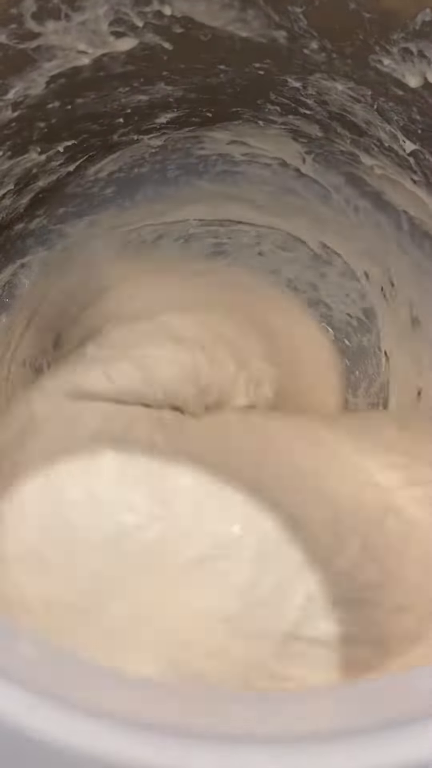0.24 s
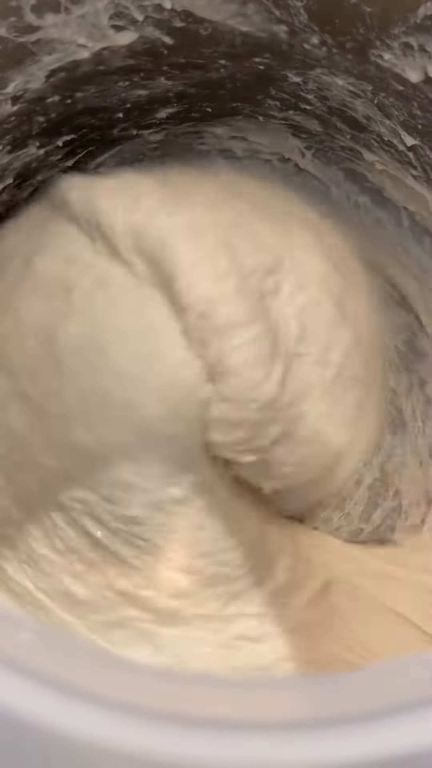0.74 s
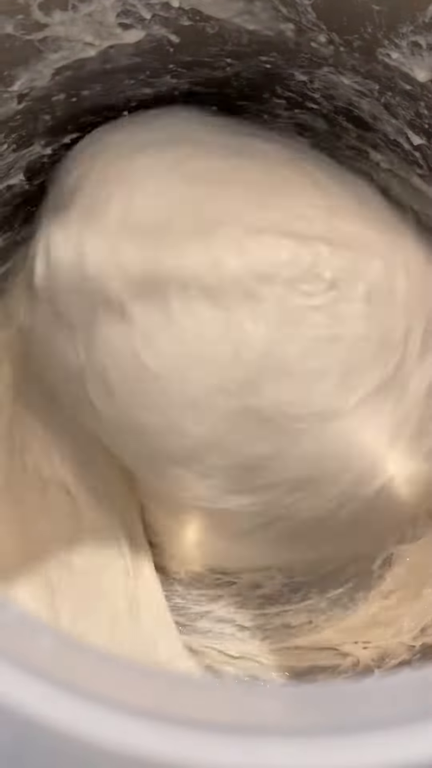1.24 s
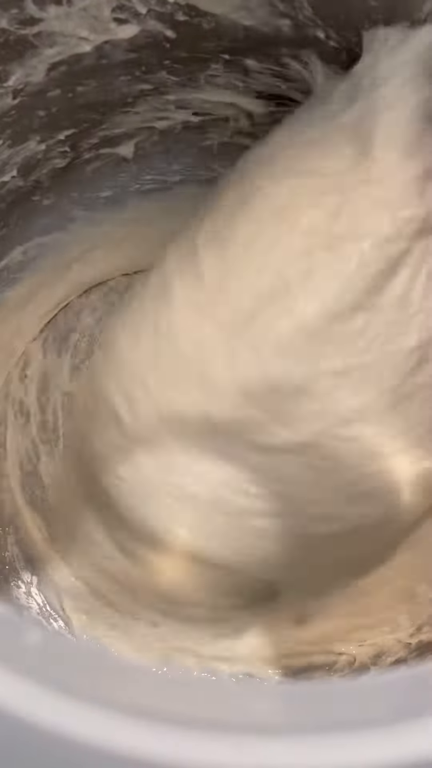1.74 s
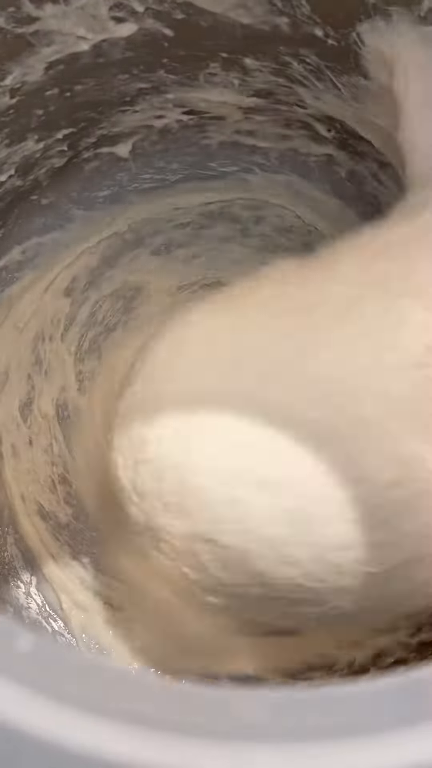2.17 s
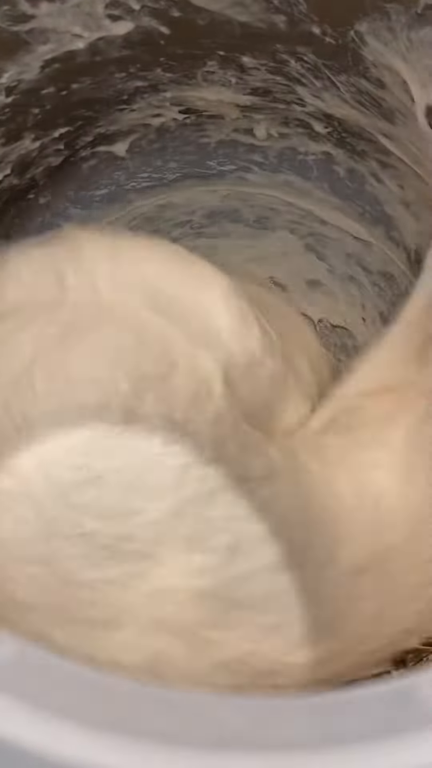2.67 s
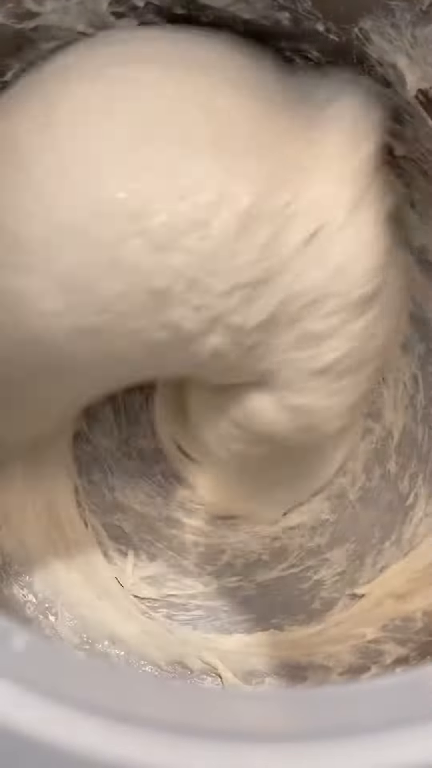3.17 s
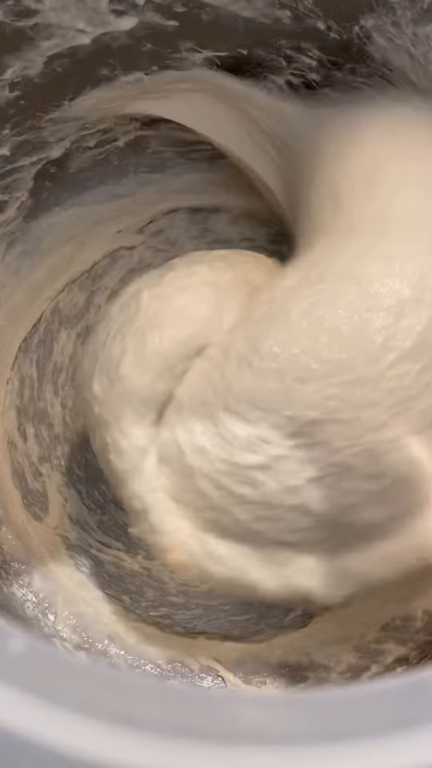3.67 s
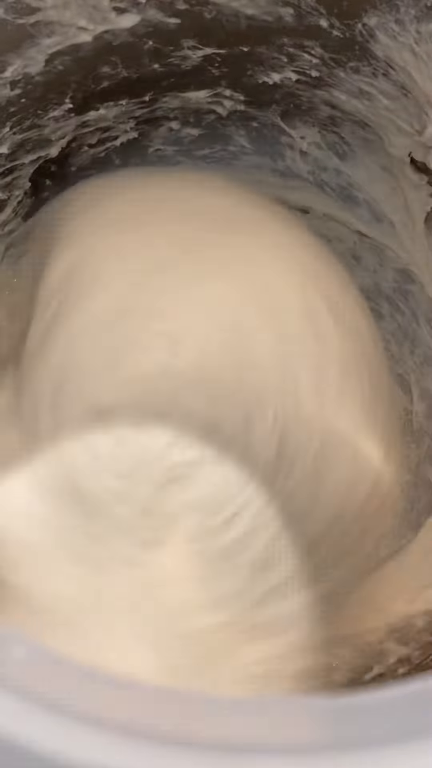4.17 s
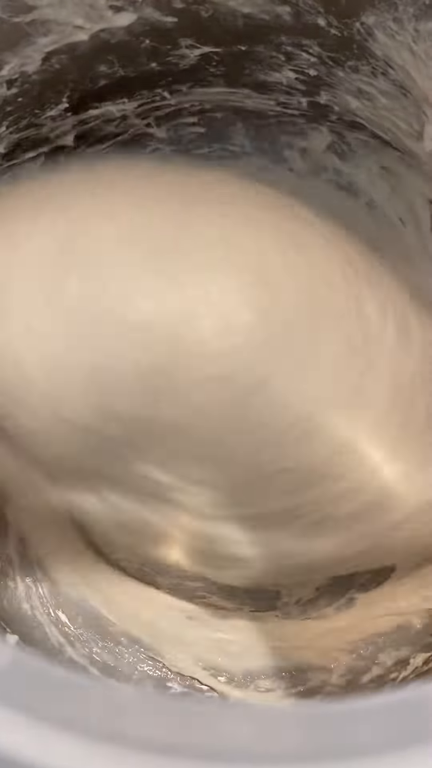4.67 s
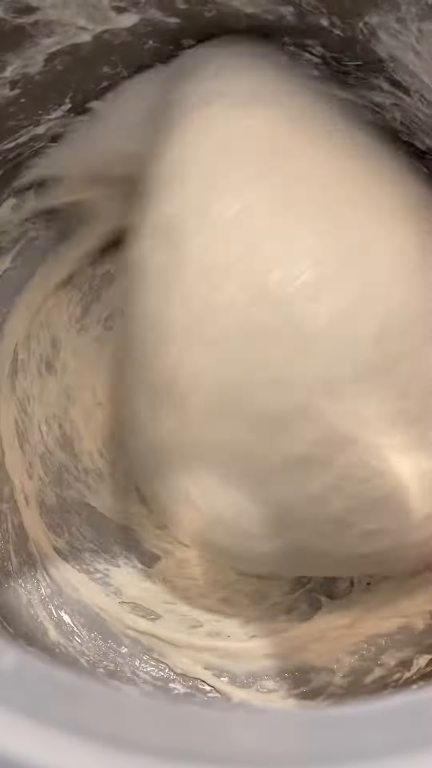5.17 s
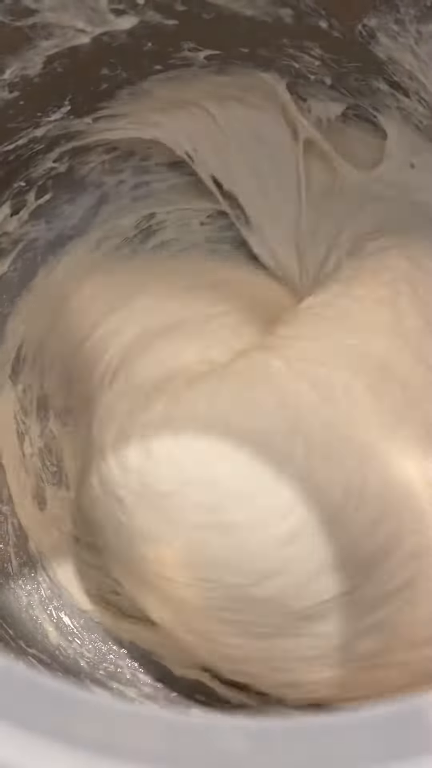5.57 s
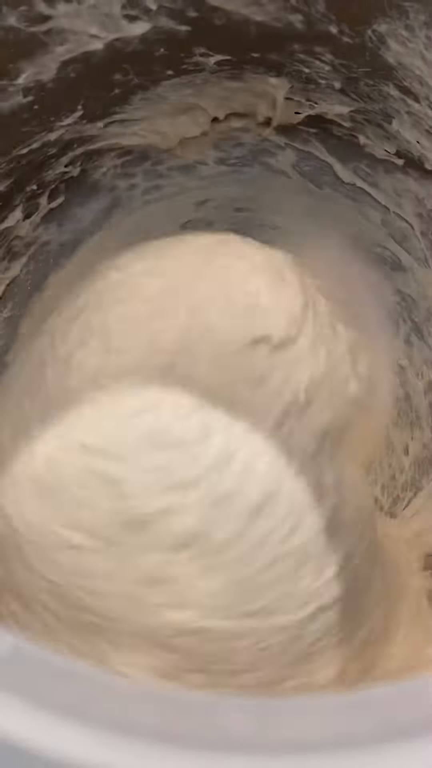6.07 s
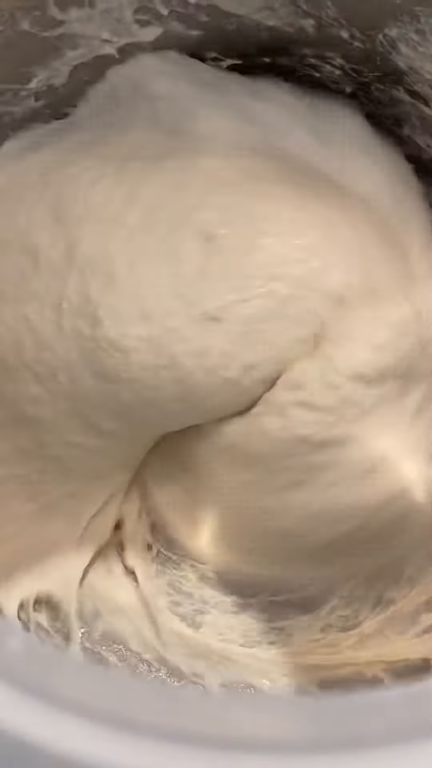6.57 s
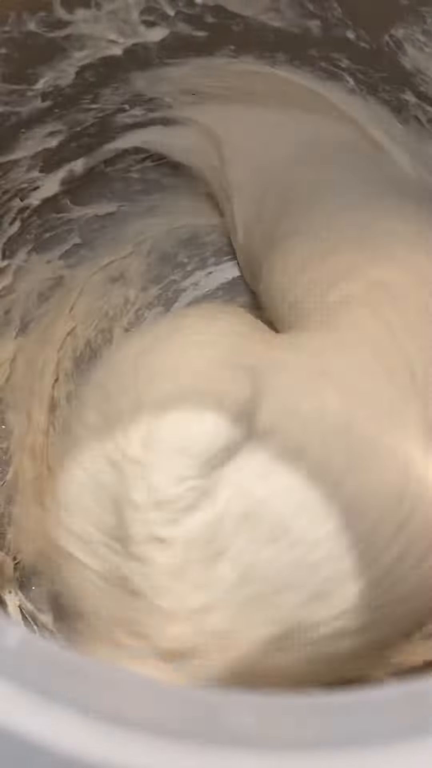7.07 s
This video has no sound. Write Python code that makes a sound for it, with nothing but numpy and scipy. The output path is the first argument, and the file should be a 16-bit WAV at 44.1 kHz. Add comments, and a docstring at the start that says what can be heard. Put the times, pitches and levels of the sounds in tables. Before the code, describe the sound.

Heard from the rim of a metal mixing bowl, heavy wet dough keeps turning. It peels with fine crackle and squelches, lands with short deep thumps and tears away with crisp smacks and rasping pops. Underneath are low drumming, mains-like hum, gear noise and a rumbling housing, pulsing about four times a second. The kneading never stops and cuts off still running, with no voice or music.

```python
"""Sticky crackle and low drumming open the scene, over the motor of an electric mixer kneading soft dough.
Close perspective: a two-port microphone at the rim of the steel bowl. About four times a second the hook
squeezes the dough and the motor whine, a swept sine, sags into a housing resonance. The lump thuds on the bowl
(short sinking tones), smacks off the wall (bursts of tiny snaps) and pops (rasping tones). Shaped noise makes
the crackle, the gears and the rumble that reaches the ports through the frame."""
import sys
import numpy as np
from scipy import signal
from scipy.fft import rfft, irfft, next_fast_len
from scipy.io import wavfile
from scipy.ndimage import uniform_filter1d, map_coordinates

SR = 44100
rng = np.random.default_rng(int(sys.argv[2]) if len(sys.argv) > 2 else 0)


def materialize(psi):
    """Save the field psi as 16-bit PCM at rate SR to the path in sys.argv[1].

    A 1-D psi becomes a single channel; in a 2-D psi each row is a channel.
    """
    bounded = np.clip(np.atleast_2d(psi).T, -1, 1)
    quanta = np.round(bounded * 32767).astype(np.int16)
    wavfile.write(sys.argv[1], SR, quanta)


N = 322371
TOP_HZ = 15900  # upper band limit of the microphone
# swing each way of the drumming and of the peeling over a turn; peeling peaks this long before the squeeze
DRUM_SWING_DB, PEEL_SWING_DB, PEEL_LEAD_S = 2.3, 2.45, 0.051

# All levels in the tables are relative; each source sets its own trim.
# The hook squeezes the dough: centre_s, whine_drop_hz, half_length_s, whine_level_db
SQUEEZES = [(.14, 85, .08, -39), (.4, 90, .085, -33), (.64, 88, .07, -34), (.885, 85, .075, -31),
            (1.135, 85, .08, -34), (1.4, 75, .07, -35), (1.65, 80, .07, -33), (1.87, 78, .06, -37),
            (2.1, 78, .06, -40), (2.37, 95, .07, -33), (2.62, 108, .09, -29), (2.89, 92, .07, -33),
            (3.16, 95, .08, -33), (3.4, 85, .07, -42), (3.64, 90, .07, -37), (3.92, 80, .07, -33),
            (4.21, 75, .07, -36), (4.48, 35, .09, -35), (4.71, 75, .1, -30), (4.97, 40, .06, -40),
            (5.2, 85, .07, -36), (5.45, 110, .07, -37), (5.7, 100, .08, -34), (5.96, 75, .06, -32),
            (6.19, 75, .06, -37), (6.46, 98, .08, -34), (6.71, 100, .08, -35), (7, 118, .09, -36),
            (7.28, 85, .06, -38)]
# The lump lands on the bowl: start_s, level_db, pitch_hz,
# rise_s (half the time to the peak; short = hard blow, long = soft lean), dead_weight_db
THUDS = [(.318, -20, 149, 0.0073, -24), (0.344, -23, 183, 0.0043, -20), (0.422, -16.5, 170, 0.0042, -0.5),
         (0.463, -20.5, 198, 0.0027, -23), (0.508, -21, 174, 0.003, -12), (.567, -21, 157, 0.0043, -14),
         (0.6704, -9, 170, 0.0046, -15), (0.905, -16, 139, 0.0035, -3), (.926, -19, 214, 0.0025, -8),
         (1.157, -16.5, 183, 0.0032, -8), (1.332, -16, 257, 0.0028, -11),
         (1.366, -19.5, 195.5, 0.0066, -20), (1.452, -18, 170, 0.003, -22), (1.582, -20, 167, 0.0047, -18),
         (1.693, -13, 192, 0.0035, -22), (2.272, -17.5, 159.4, 0.0053, -26), (2.4, -7.5, 198, 0.0032, -17),
         (2.463, -22.5, 202, 0.004, -20), (2.631, -13.5, 183, 0.0036, -10), (2.825, -16, 219, 0.0034, -22),
         (2.922, -13, 173, 0.0026, -1.5), (3.084, -19, 220, 0.0031, -5), (3.273, -18, 199, 0.0035, -22),
         (3.38, -21, 200, 0.0045, -18), (3.445, -18, 156, 0.0024, -18), (3.504, -20, 213, 0.0037, -24),
         (3.689, -21, 214, 0.0036, -11), (3.95, -18, 217, 0.0024, -3.5), (4.262, -17, 173, 0.003, -4),
         (4.754, -16.5, 197, 0.0034, -15), (5.004, -19, 179, 0.0047, -11), (5.15, -18.5, 200, 0.0024, -12),
         (5.251, -20, 200, 0.004, -20), (5.495, -8, 192, 0.0027, -11), (5.723, -12.5, 200, 0.0041, -4),
         (5.957, -21.5, 198, 0.0048, -20), (6.252, -18.5, 198, 0.0028, -22),
         (6.317, -16.5, 174, 0.0023, -15), (6.354, -19.5, 159, 0.0081, -20),
         (6.878, -24.5, 210, 0.0047, -15), (7.013, -12, 149, 0.003, -7), (7.049, -19.5, 200, 0.0031, -7)]
# Dough slaps or tears off the wall: start_s, level_db, body_db, tear_fineness_db, rise_s
SLAPS = [(0.053, -43.5, -6, -3, 0.0071), (0.422, -32.5, -5.5, 1, 0.0048), (0.51, -51, 7, -3, 0.0092),
         (.663, -32, 0, -3.5, .0026), (0.747, -53.5, 9, -4, .002), (0.895, -42, -5, -4, 0.0028),
         (1.108, -49, -2, -2, 0.0083), (1.154, -39.5, -18, 4.5, 0.0033), (1.251, -45, 0.5, -3.5, 0.0029),
         (1.307, -45.5, 1, -6.5, 0.0038), (1.333, -23, -4, -5, 0.0018), (1.433, -40.5, -27, -1, 0.00086),
         (1.583, -50, -5, 5.5, .003), (1.634, -35.5, -20, 2.5, 0.0021), (1.69, -32.5, -11, -4, 0.0015),
         (1.83, -43, -15, -1, 0.0064), (2.035, -33.5, -19, -5, 0.0042), (2.395, -34, -8, 0.5, .0026),
         (2.504, -32, -5, 2, 0.0019), (2.564, -50.5, 4, 7, 0.006), (2.672, -52.5, -22, 12, .002),
         (2.79, -41, 5, -5, 0.0025), (2.811, -38, 2, -1, 0.003), (2.907, -50, 10.5, 3, 0.013),
         (2.984, -44.5, -8, -1, .003), (3.178, -41, -8, 3.5, .0026), (3.242, -49.5, -2.5, 3, .002),
         (3.441, -43, 3, -3, .0015), (3.632, -49, 5.5, 8, 0.0093), (3.704, -44.5, -16, 0, .002),
         (3.861, -42, 1.5, -3.5, 0.0016), (4.082, -46.5, -3.5, -2.5, .003), (4.118, -42, -5, 1, 0.0032),
         (4.531, -47, 2, -2, 0.0046), (4.677, -45, -21, -2, 0.0046), (4.835, -59, 15, -4, .0026),
         (4.964, -44.5, -20, 1.5, .0026), (5.03, -44.5, -30, 4, .001), (5.117, -56, 0, -4, .003),
         (5.354, -51, 2.5, 8, 0.0018), (5.375, -50, 6, 2, 0.0075), (5.401, -45, -3, -3, .005),
         (5.488, -30.5, -13, -5, 0.00077), (5.612, -42, -2, -2.5, 0.00093),
         (5.72, -30.5, -19, -7.5, 0.0019), (5.8, -52, -5, -2.5, 0.0037), (5.879, -38.5, -7.5, -2.5, 0.0034),
         (5.986, -51.5, -15, 11, 0.0017), (6.083, -45.5, -7, -3, 0.006), (6.25, -31.5, -25, 4.5, 0.0017),
         (6.42, -44, -5, -0.5, 0.011), (6.486, -49, -3, -3, 0.0031), (6.63, -42, -16, 9, 0.0016),
         (7.007, -41, -18, 3, .002), (7.209, -36.5, -1, 3.5, 0.0046), (7.221, -37.5, -8, 0, 0.0014)]
# Air pockets pop out of the dough: start_s, level_db, pitch_hz
POPS = [(.152, -44, 1440), (.276, -45, 1490), (.333, -39.5, 677), (.413, -30.5, 1636), (.424, -38, 1444),
        (.449, -35.5, 732), (.619, -40, 507), (.663, -29, 2243), (.68, -34, 724), (.748, -40, 985),
        (.862, -43, 1386), (.9, -38, 500), (1.014, -42, 958), (1.064, -38.5, 802), (1.135, -43.5, 1430),
        (1.157, -43, 885), (1.249, -39, 1410), (1.334, -27, 946), (1.335, -29, 1770), (1.706, -45, 1370),
        (2.496, -38, 1455), (2.505, -30, 2070), (2.516, -35, 1910), (2.507, -35.5, 662),
        (2.602, -35.5, 1224), (2.628, -38.5, 1518), (2.79, -36, 1864), (2.904, -40, 1470),
        (2.912, -41, 1047), (3.167, -41, 940), (3.35, -40, 1000), (3.443, -30, 941), (3.632, -37.5, 1028),
        (3.865, -50, 1160), (3.905, -45.5, 1360), (4.044, -45, 931), (4.117, -45, 970), (4.534, -42, 1416),
        (5.184, -36.5, 1490), (5.37, -43, 462), (5.382, -47, 850), (5.412, -34, 650), (5.49, -40, 927),
        (5.724, -35, 2570), (6.098, -47, 2140), (6.143, -43.5, 1134), (6.335, -32.5, 1220),
        (6.435, -43.5, 1120), (6.657, -42.5, 1380), (6.685, -46, 2040), (6.728, -49, 1323),
        (6.874, -43, 900), (6.918, -44, 952), (7.042, -42, 740), (7.218, -42, 1520), (7.224, -30, 544)]
# Sticky peeling of the dough: time_s, level_db
PEELING = [(0, -41.5), (.35, -44.5), (.6, -43.5), (.85, -40.5), (.98, -44.5), (1.15, -40.5), (1.52, -49),
           (1.65, -40), (1.92, -46), (2.2, -40), (2.33, -42.5), (2.6, -39.5), (2.75, -43.5), (2.86, -40),
           (3.4, -42), (3.6, -40), (3.78, -42.5), (3.9, -42.5), (4.35, -49.5), (4.8, -46), (5.08, -46.5),
           (5.38, -39), (5.53, -42), (5.63, -40.5), (5.8, -43.5), (5.92, -43), (6.65, -41), (6.78, -44),
           (6.88, -40), (7.1, -46), (7.3, -46)]
# Dough pressing and tumbling in the bowl: time_s, level_db
TUMBLE = [(0, -29.5), (.6, -24), (1, -27.5), (2, -26), (2.6, -26.5), (3.4, -25.5), (4, -28), (4.09, -29),
          (4.18, -27.5), (5.3, -27.5), (5.45, -28.5), (5.68, -28.5), (5.8, -24), (5.97, -29.5), (6.02, -32),
          (6.09, -37), (6.13, -24), (6.175, -29), (6.2, -44), (6.235, -35), (6.27, -27.5), (6.7, -28),
          (7.3, -25.5)]
# Deep sway of the machine, swelling each time the lump comes round: time_s, level_db
SWAYING = [(0, -48), (.25, -55), (.65, -53), (1.35, -38.5), (1.95, -50), (2.7, -40.5), (3.65, -46.5),
           (4.15, -36), (4.75, -52), (5, -46), (5.35, -57), (5.7, -42), (6.45, -53), (6.75, -43.5),
           (7.3, -43.5)]
# Housing shake: time_s, level_db
SHAKING = [(0, -36), (.55, -30.5), (2, -34.5), (3.3, -31), (5.1, -35), (5.5, -23.5), (5.9, -30), (7, -29.5),
           (7.3, -30)]
# Frame vibration that moves both ports together: time_s, amplitude_share (0-1)
FRAME_TOGETHER = [(0, 0.25), (4.9, 0.03), (5.3, 0.33), (6.3, 0.07), (6.7, 0.69), (7.3, 1)]
# Part of the whine that reaches both ports alike: time_s, level_db
WHINE_SHARED = [(0, -15), (3.4, -15), (3.9, -12), (4.7, -9), (6, -9), (6.6, -13), (7.3, -8)]

# Modes of the loaded bowl: centre_hz, width_hz, level_db
BOWL_MODES = [(113.6, 34, -8), (139.6, 21.3, 0.5), (224.3, 51, 1.5), (243.5, 31.7, -3.5)]
# Modes of the air hollow in the bowl: centre_hz, width_hz, level_db
HOLLOW_MODES = [(937, 68, 3.5), (1117, 110, -2.5), (1371, 48, 1.5), (1620, 8, -24), (1783, 5, -12),
                (1955, 26, 3), (2024, 36, 8), (2300, 55, 1.5), (2550, 14, 6.5), (2706, 52, 0.5),
                (2820, 41, 8.5), (3260, 23, 2.5), (3550, 26, 8.5), (3900, 25, 5), (3970, 15, -15),
                (4260, 38, 12.5)]
# Motor hum lines, mains multiples 2 to 4: level_db
MAINS_LINES_DB = [-15, -3, 0]

# Colours of the noises, all: frequency_hz, density_db (per Hz)
# dull knock of a landing
KNOCK_COLOUR = [(150, -12), (300, 1), (450, -4), (700, -18), (1500, -20)]
# a slap: its body, its smack and its fine spray
BODY_COLOUR = [(200, -4), (350, 10.5), (560, -9), (800, 7.5), (1000, -0.5), (1500, 1.5), (3000, -16)]
SMACK_COLOUR = [(1200, -8.5), (2600, 5.5), (4000, 10.5), (6000, 1.5), (9000, -32)]
SPRAY_COLOUR = [(4000, -27), (7500, 3.5), (11000, 5.5), (16000, -2.5)]
# strands peeling off the steel
STICKY_COLOUR = [(800, -27), (2000, 4), (4000, 4.5), (5500, -8), (6800, 5.5), (8500, 6.5), (10500, 7),
                 (13500, 6.5), (16000, 8.5)]
# gears and fan
GEAR_COLOUR = [(250, -73), (550, -2), (700, 15.5), (950, 2.5), (1400, 8), (1700, 4), (2020, 5.5),
               (2300, -7), (2850, -11), (3150, -29), (4500, 5), (5600, -14), (6600, -5), (10000, -1),
               (16000, -47)]
# frame vibration: deep sway, shake and housing drone
SWAY_COLOUR = [(20, -45), (32, -20), (48, -3), (75, -2), (110, -10), (200, -40)]
SHAKE_COLOUR = [(45, -51), (95, 6), (150, 2.5), (210, 4), (290, -10.5), (600, -21.5), (1500, -63)]
HOUSING_COLOUR = [(150, -28), (300, -26), (430, 12.5), (550, 0.5), (740, -5), (1000, 0), (1500, -32),
                  (3000, -49)]

# Phase between the two microphone ports: frequency_hz, left_lead_rad
PORT_PHASE = [(250, -.6), (450, -2.6), (1000, -3.6), (1400, -1.8), (2000, 0.47), (2800, 2.1), (3900, 1.32),
              (5600, 3.1), (6800, 4.21), (8600, 6.15), (10200, 7.6), (11700, 9.4), (14600, 11.8),
              (16000, 12.7)]
# Likeness of the two ports: frequency_hz, likeness (0-1)
PORT_LIKENESS = [(200, 1), (900, 0.89), (1500, 0.023), (2400, 0.15), (3500, 0.87), (5600, 1), (7000, 0.96),
                 (11700, 1), (16000, 0.89)]
# Balance of sound leaving the bowl: frequency_hz, left_minus_right_db
PORT_BALANCE = [(100, -5.5), (220, -15), (400, -14), (800, -12.5), (1300, 1), (2200, -4), (4000, -3.5),
                (5500, -0.5)]


def thuds(sink_s=0.00078, settle_rises=3.54, ring_db=-8, weight_hz=100, weight_s=0.0048,
          knock_db=-22, knock_t60=0.14):
    """The lump lands: a dull knock, a low push, and a few cycles of the wall that sink most after a hard blow."""
    out, t = np.zeros((2, N)), np.arange(SR // 8) / SR

    def push(rise):
        return (t / rise / 2) ** 2 * np.exp(2 - t / rise)

    for s, db, hz, rise_s, weight_db in THUDS:
        sink = 2 * np.exp(-t / (settle_rises * rise_s)) - 1  # from above the pitch to below it
        pitch = hz * (1 + sink_s / rise_s * sink)
        wall = push(rise_s) * np.sin(2 * np.pi * np.cumsum(pitch) / SR)
        weight = amp(weight_db - 3.5) * push(weight_s) * np.sin(2 * np.pi * weight_hz * t)
        knock_shape = amp(knock_db - 60 * t / knock_t60) * (1 - np.exp(-t / rise_s))
        knock = knock_shape * coloured(rng.standard_normal((2, len(t))), KNOCK_COLOUR)
        add(out[0], s, amp(db - 0.5) * (wall + weight))
        add(out, s, amp(db) * knock)
    out = filtered(out, lambda hz: hz ** 4 / (hz ** 4 + 62 ** 4))  # low cut
    return out + amp(ring_db) * resonate(out, [(206.6, 12.6, 12.3)])


def smacks(body_t60=0.11, smack_t60=0.06, spray_t60=0.062):
    """A film of dough ruptures in a burst of tiny snaps."""
    out, t = np.zeros((2, N)), np.arange(SR // 7) / SR
    fits = amp(2.2 * np.array([wobble(260), wobble(260)]))  # the tear runs in fits and starts
    for s, db, body_db, fine_db, rise_s in SLAPS:
        swell = 1 - np.exp(-(t / rise_s) ** 2)

        def burst(colour, t60):
            return unit(coloured(snaps, colour) * swell * amp(-60 * t / t60))

        index = rng.integers(N - len(t))
        snaps = grains((2, len(t)), rate=7000, spread_db=2.0) * fits[:, index:index + len(t)]
        slap = (amp(db + body_db - 4.0) * burst(BODY_COLOUR, body_t60)
                + amp(db - fine_db - 12.0) * burst(SMACK_COLOUR, smack_t60)
                + amp(db + fine_db - 8.5) * burst(SPRAY_COLOUR, spray_t60))
        add(out, s - .001, slap)
    return out


def wet_tails(count=8, centre_hz=1900, life_s=0.003, length_s=0.036, fade_db=10):
    """After each slap the torn film shrinks back in a ragged string of small wet pops."""
    out = np.zeros((2, N))
    for s, db, body_db, _, rise_s in SLAPS:
        for late, pitch, path in rng.random((count, 3)):
            hz = centre_hz * 3 ** (pitch - .5)
            gain = amp(db + body_db / 2 - fade_db * late)
            add(out[int(path > .5)], s + rise_s + late * length_s, gain * np.real(pocket(hz, life_s)))
    return out


def pops(level_db=5.0, life_s=0.0046, port_turn_rad=0.87, side_db=-0.5, ring_db=-9):
    """The larger air pockets pop one by one, out of phase at the two ports, and ring the hollow of the bowl."""
    out, sides = np.zeros((2, N)), np.array([[-1], [1]])  # left, right
    for s, db, hz in POPS:
        gain = amp(db + level_db + sides * side_db) * np.exp(1j * sides * port_turn_rad)
        add(out, s, np.real(gain * pocket(hz, life_s, rough=0.48)))
    return out + amp(ring_db) * resonate(out, HOLLOW_MODES, step=1)


def crackle():
    """Fine strands peel off the steel in clumps, most of all just before each squeeze."""
    peel_db, = curves(PEELING)
    clumps = amp(PEEL_SWING_DB * stroke(PEEL_LEAD_S) + 1.8 * wobble(75))
    snaps = grains((2, N), rate=5000, spread_db=2.8)
    return amp(peel_db) * clumps * coloured(snaps, STICKY_COLOUR)


def strands(count=450, centre_hz=2800, life_s=0.0012, level_db=-5.0):
    """Thicker strands snap singly with short wet ticks, as strongly as the dough peels."""
    out = np.zeros((2, N))
    # -1 to 1 spans the scene, so none snaps in the first moment
    for when, pitch, size, length, path in rng.uniform(-0.92, 1, (count, 5)):
        hz = centre_hz * np.exp(.45 * pitch)
        tick = amp(6 * size) * np.real(pocket(hz, life_s * 2 ** length))
        add(out[int(path > 0)], (when + 1) / 2 * N / SR, tick)
    return out * amp(curves(PEELING)[0] + level_db)


def squelches(count=520, centre_hz=1300, life_s=0.003, level_db=-45.3, swing_db=1.0):
    """Folds squeeze out many tiny pockets, each with its own pitch and size."""
    out = np.zeros((2, N))
    # -1 to 1 spans the scene; draws below -1 all open at its start
    for when, pitch, size, length, path in rng.uniform(-1.1, 1, (count, 5)):
        hz = centre_hz * np.exp(.6 * pitch)
        spread_db = 6 * size - 2 * pitch
        squelch = amp(level_db + spread_db) * np.real(pocket(hz, life_s * 2 ** length, rough=0.73))
        add(out[int(path > 0)], (when + 1) / 2 * N / SR, squelch)
    return out * amp(swing_db * stroke(PEEL_LEAD_S))


def pocket(hz, life_s, rough=0.8):
    """An air pocket opens: a short, rasping tone that peaks after life_s, as a complex signal."""
    t = np.arange(SR // 14) / SR
    rasp = unit(uniform_filter1d(rng.standard_normal((2, len(t))), size=60))
    tone = t / life_s * np.exp(1 - t / life_s + 2j * np.pi * hz * t)
    return tone * (1 + rough * (rasp[0] + 1j * rasp[1])) / np.hypot(1, rough)


def tumbling(dull_hz=330):
    """Countless soft bumps of the dough keep the damped bowl drumming, in a narrow band around its modes."""
    bumps = grains((2, N), rate=700, spread_db=1)

    def band(hz):
        low_cut = hz ** 4 / (hz ** 4 + 95 ** 4)
        return low_cut / (1 + (hz / dull_hz) ** 4)

    drum = filtered(resonate(bumps, BOWL_MODES), band)
    tumble_db, = curves(TUMBLE)
    return amp(tumble_db - 5.0 + DRUM_SWING_DB * stroke() + 0.56 * wobble(18)) * unit(drum)


def hollow(x, direct_db=-1.0):
    """Sound made inside the bowl rings its hollow, whose pitch shifts as the lump moves about."""
    def ring(ratio):
        modes = [(hz * ratio, width, db) for hz, width, db in HOLLOW_MODES]
        return resonate(x, modes, step=0.94)

    low, high = ring(1 - .012), ring(1 + .012)
    fill = (1 + np.tanh(wobble(6))) / 2  # drifts at random between the two
    return amp(direct_db) * (x + (1 - fill) * low + fill * high)


def whine(free_hz=830, peak_hz=745, width_hz=76):
    """The motor slows under each squeeze; its whine surfaces only as it sags into a housing resonance."""
    t = np.arange(N) / SR
    pitch = free_hz - sum(drop * np.exp(-((t - s) / half) ** 2) for s, drop, half, _ in SQUEEZES)
    whine_db = curves(SQUEEZES)[-1]
    swell = 1 / (1 + (2 * (pitch - peak_hz) / width_hz) ** 2)
    flutter_db, jitter_hz = 3 * wobble(50) - 1.2, 10 * wobble(120)
    phase = 2 * np.pi * np.cumsum(pitch + jitter_hz) / SR
    return amp(whine_db + flutter_db) * swell * np.sin(phase)


def hum(pitch_hz=464, level_db=-40.5):
    """The drive hums with a rough tone, wavering in pitch and level."""
    pitch = pitch_hz + 15 * wobble(80)
    flutter = amp(4 * wobble(45))
    return amp(level_db) * flutter * np.sin(2 * np.pi * np.cumsum(pitch) / SR)


def motor(mains_hz=49.8, level_db=-7.5):
    """Magnetic hum on multiples of the mains; it grows as the dough presses, and each line wavers."""
    turns = np.cumsum(mains_hz + .9 * wobble(16)) / SR
    lines = sum(amp(db + 3 * wobble(11)) * np.sin(2 * np.pi * order * turns)
                for order, db in enumerate(MAINS_LINES_DB, 2))
    tumble_db, = curves(TUMBLE)
    return np.array([amp(tumble_db + level_db) * unit(lines), np.zeros(N)])  # direct path only


def housing(shake_trim_db=-5.0, drone_db=-46, leak_db=-16, rock_hz=49, rock_db=-9):
    """Motor vibration travels through the frame and drives the ports partly together, partly in opposition."""
    sway_db, = curves(SWAYING)
    shake_db, = curves(SHAKING)
    sway = amp(sway_db) * coloured(rng.standard_normal((2, N)), SWAY_COLOUR)
    jolts = grains((2, N), rate=400, spread_db=2.5)
    shake = amp(shake_db + shake_trim_db + 0.49 * wobble(37.0)) * coloured(jolts, SHAKE_COLOUR)
    unsteady = amp(2.8 * wobble(18) + 2 * stroke(PEEL_LEAD_S) - 1)
    drone_noise = patches(rng.standard_normal((2, N)), depth_db=4)
    drone = amp(drone_db) * unsteady * coloured(drone_noise, HOUSING_COLOUR)
    tight, loose = sway + shake + drone  # two independent vibrations
    tone, low_tone = whine(), hum()

    together, = curves(FRAME_TOGETHER)
    turn = np.arcsin(np.clip(together, 0, 1))
    # the rotor rocks the whole frame
    rock_phase = 2 * np.pi * np.cumsum(rock_hz + 2 * wobble(11)) / SR
    rock = amp(sway_db + rock_db + 2.6 * wobble(6)) * np.sin(rock_phase)
    shared_tone = amp(curves(WHINE_SHARED)[0]) * tone
    leak = amp(leak_db) * loose + amp(-17) * sway[1]
    common = leak + shared_tone + np.sin(turn) * (tight + .35 * low_tone) + rock
    opposed = np.cos(turn) * tight + tone + low_tone
    return np.array([common + opposed, common - opposed])


def gears(level_db=-47.3, swing_db=0.5):
    """Gear and fan noise, nearly steady in level but patchy in colour."""
    effort_db = swing_db * stroke(PEEL_LEAD_S) + 1.3 * wobble(17)
    noise = patches(rng.standard_normal((2, N)), depth_db=5)
    return amp(level_db + effort_db) * coloured(noise, GEAR_COLOUR)


def ports(pair):
    """Direct sound (row 0) and scattered sound (row 1) reach the two microphone ports."""
    def response(hz):
        turn = np.arccos(np.clip(along(PORT_LIKENESS, hz), 0, 1)) / 2
        sides = np.array([[1], [-1]])  # left, right
        gain = amp(sides * along(PORT_BALANCE, hz) / 2)
        gain = gain / np.sqrt(np.mean(gain ** 2, axis=0))
        gain = gain * np.exp(.5j * sides * along(PORT_PHASE, hz))
        # scattered sound arrives with opposite signs and makes the ports differ
        return np.array([gain * np.cos(turn), gain * sides * np.sin(turn)])
    return filtered(pair[:, None], response).sum(axis=0)


def stroke(lead_s=0):
    """+1 at each squeeze, -1 halfway between, looking lead_s ahead."""
    times = np.transpose(SQUEEZES)[0]
    count = np.interp(np.arange(N) / SR + lead_s, times, np.arange(len(times)))
    return np.cos(2 * np.pi * count)


def patches(x, depth_db):
    """Each part of the spectrum swells and fades on its own; the treble stays smoother."""
    hz, _, z = signal.stft(x, SR, nperseg=1024)
    depth = depth_db / (1 + (hz[:, None] / 4000) ** 2)
    field = rng.standard_normal(z.shape[1:])
    for _ in range(2):
        field = uniform_filter1d(field, size=4, axis=0)  # across frequency
        field = uniform_filter1d(field, size=3, axis=1)  # across time
    return unit(signal.istft(z * amp(depth * unit(field)), nperseg=1024)[1][..., :N])


def grains(shape, rate, spread_db):
    """Sparse random impulses of uneven size, rate a second, at rms 1."""
    sizes = rng.standard_normal(shape) * amp(spread_db * np.clip(rng.standard_normal(shape), -2, 2))
    return unit(sizes * (rng.random(shape) < rate / SR))


def resonate(x, modes, step=-1):
    """x rings a set of (Hz, width, dB) modes; each is weighted by step to its index, so -1 alternates signs."""
    def response(f):
        return sum(step ** k * amp(db) * 1j * f * width / (centre * centre - f * f + 1j * f * width)
                   for k, (centre, width, db) in enumerate(modes))
    return filtered(x, response)


def coloured(x, spectrum):
    """x shaped by a spectrum, at rms 1."""
    return unit(filtered(x, lambda hz: amp(along(spectrum, hz))))


def filtered(x, response):
    """x times a complex response of frequency."""
    size = x.shape[-1]
    m = next_fast_len(size + 8192)  # room for ringing
    return irfft(rfft(x, m) * response(np.fft.rfftfreq(m, 1 / SR)), m)[..., :size]


def wobble(rate):
    """A smooth random curve, rate knots a second."""
    return map_coordinates(rng.standard_normal(4096), [np.arange(N) * rate / SR], mode="wrap")


def curves(rows):
    """One value per sample for each column after the time."""
    s, *cols = np.transpose(rows)
    return [np.interp(np.arange(N) / SR, s, c) for c in cols]


def along(points, hz):
    """(Hz, value) points read on a log frequency axis."""
    f, v = np.transpose(points)
    return np.interp(np.log(hz + 1), np.log(f + 1), v)


def add(track, s, sound):
    """Mix a sound into a track at time s, or at the start if s is negative."""
    part = track[..., max(round(s * SR), 0):][..., :sound.shape[-1]]
    part += sound[..., :part.shape[-1]]


def amp(db):
    """Decibels to gain."""
    return 10 ** (np.asarray(db) / 20)


def unit(x):
    """Scale to rms 1."""
    return x / np.sqrt(np.mean(x ** 2) + 1e-20)


def scene():
    """Airborne sound from the bowl, plus pops and vibration through the frame straight at the ports."""
    inside = hollow(smacks() + wet_tails() + crackle() + strands() + squelches() + gears())
    return ports(thuds() + inside + tumbling() + motor()) + pops() + housing()


def record(dry):
    """The microphone keeps nothing above its band limit."""
    return filtered(dry, lambda hz: hz < TOP_HZ)


dry = scene()
out = record(dry)
materialize(out)
```